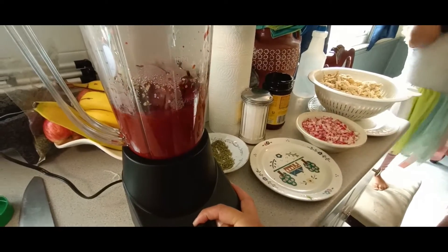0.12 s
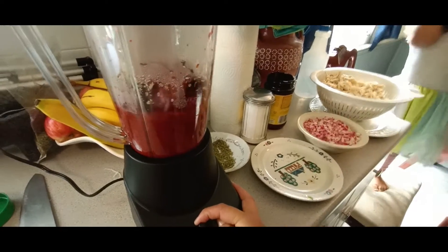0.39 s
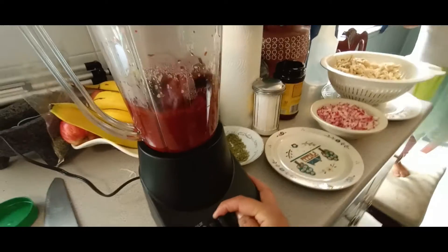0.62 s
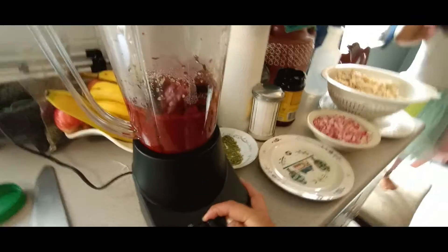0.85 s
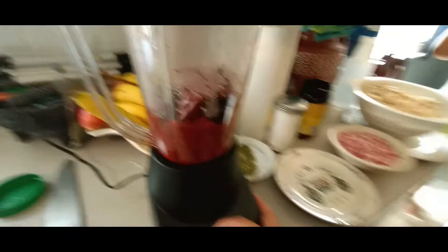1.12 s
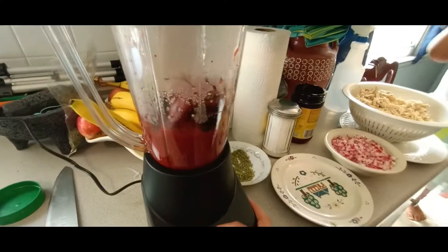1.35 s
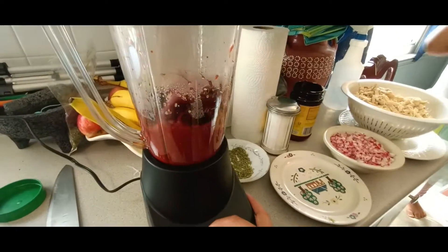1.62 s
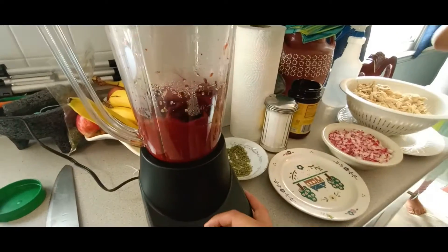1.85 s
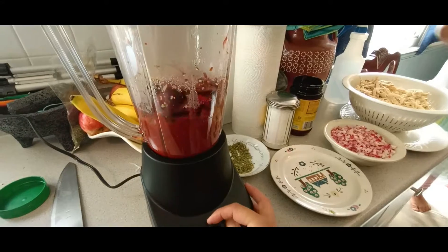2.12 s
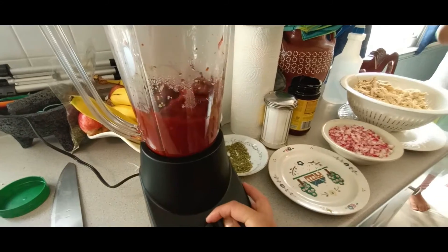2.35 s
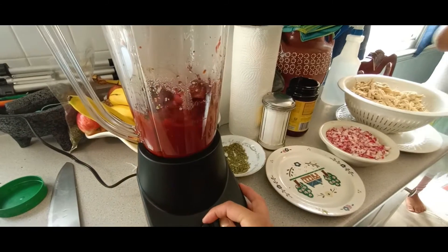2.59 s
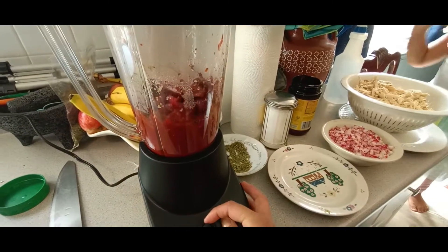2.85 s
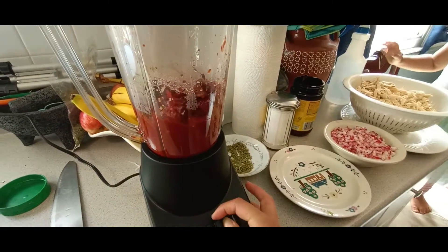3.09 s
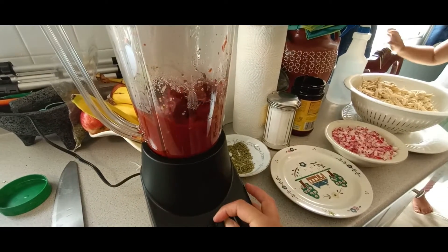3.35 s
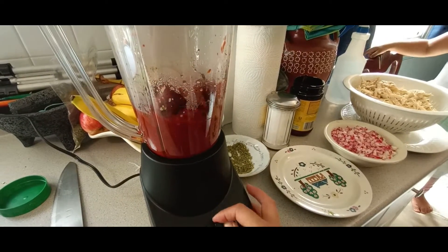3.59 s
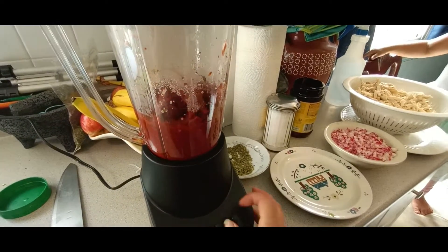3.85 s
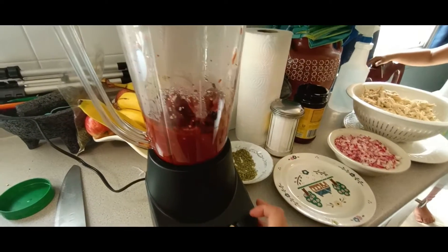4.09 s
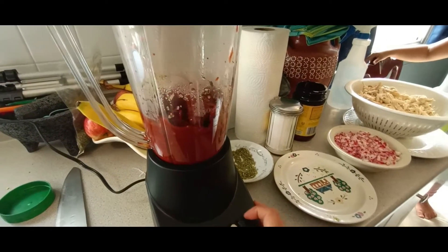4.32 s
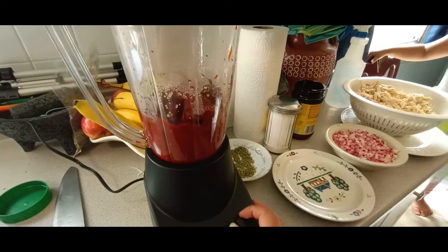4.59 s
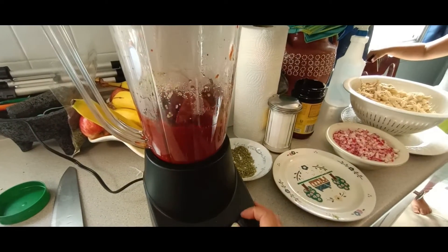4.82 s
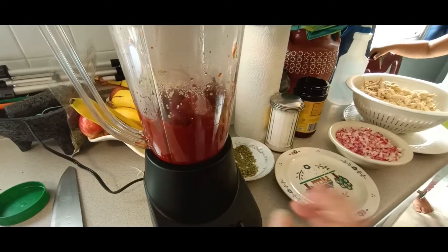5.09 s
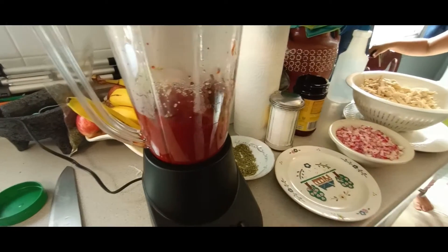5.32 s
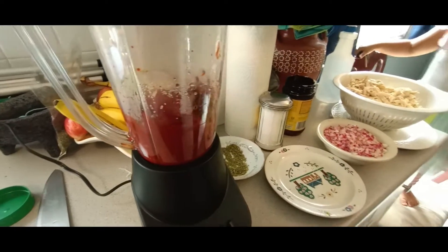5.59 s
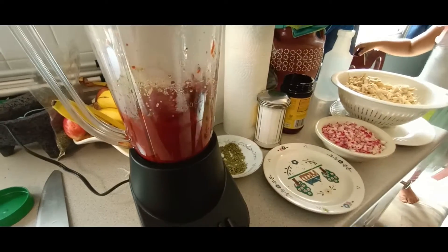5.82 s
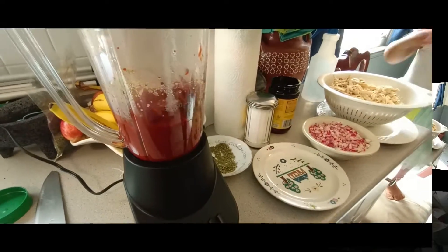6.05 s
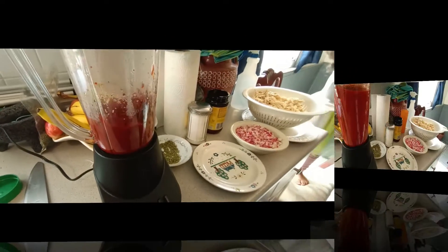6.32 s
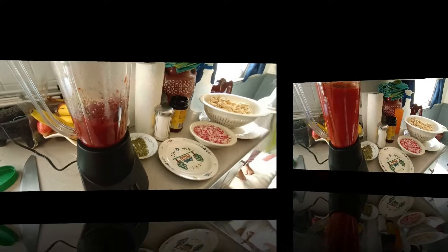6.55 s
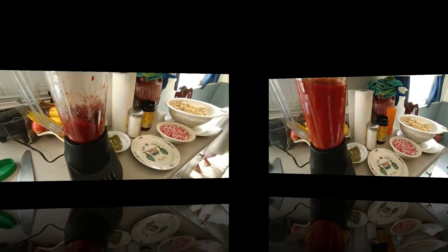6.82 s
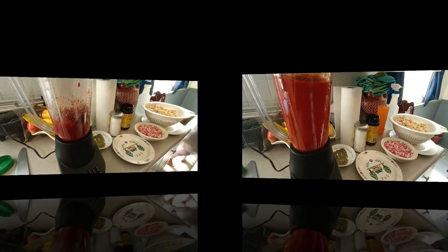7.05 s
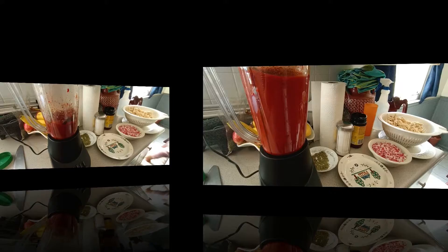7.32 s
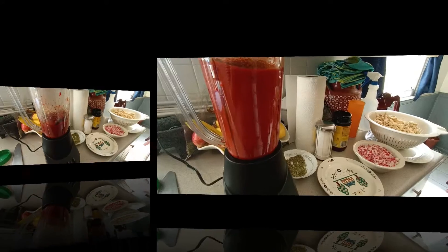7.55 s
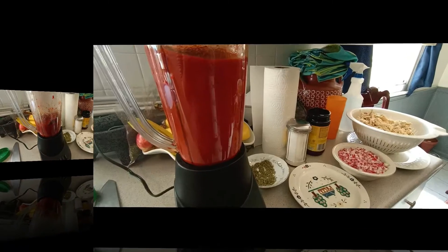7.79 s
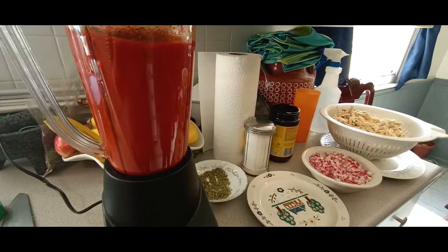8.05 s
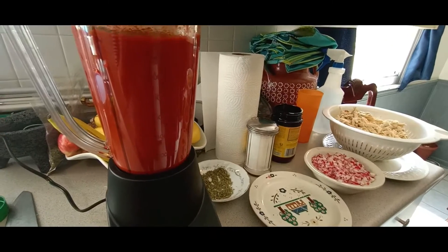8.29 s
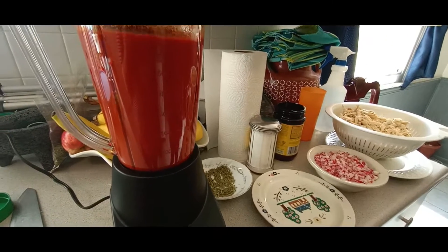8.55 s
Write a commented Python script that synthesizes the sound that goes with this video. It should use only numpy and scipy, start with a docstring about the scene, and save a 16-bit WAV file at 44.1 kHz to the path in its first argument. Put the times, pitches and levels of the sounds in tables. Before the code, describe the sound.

Close, dense blender noise: broadband rushing air and spray hiss, a ringing plastic jar, rapid blade rattle and a high electric whine over a faint low buzz. Soft fruit pulp makes it pulse and wobble unevenly, busiest early on. Short kitchen reflections surround it. The sound fades away, goes silent briefly, and a second smoother blend with a full jar swells in at the very end.

```python
"""Blender pureeing soft food

A countertop blender runs close to a mono microphone in a kitchen. Air, churning pulp and knocks are shaped
noise that rings the jar and base. The motor whines on multiples of its shaft speed, which sags when the
blades catch a lump; a faint buzz of its windings lies underneath, and the roar has kitchen reflections.
The sound is faded out, and after a silence the now fuller jar, running steadily, is faded in.
"""
import sys
import numpy as np
from scipy import signal
from scipy.fft import rfft, irfft, next_fast_len
from scipy.io import wavfile
from scipy.ndimage import uniform_filter1d

SR = 44100
rng = np.random.default_rng(int(sys.argv[2]) if len(sys.argv) > 2 else 0)


def wrap_up_sound(samples):
    """Save the sound to the file named by the first command line argument, as 16-bit audio."""
    columns = np.atleast_2d(samples).T
    # keep every value between -1 and 1, then stretch to whole-number steps
    tamed = np.clip(columns, -1, 1)
    steps = np.round(tamed * 32767).astype(np.int16)
    wavfile.write(sys.argv[1], SR, steps)


def ratio(d):
    """dB to gain"""
    e = np.asarray(d, float) / 20
    return 10 ** e


N = 382347
SWITCH_S = 8.2  # the second run takes over here, during the silence

# Broad colour of the roar, before its overall level is set: (frequency [Hz], relative level [dB])
ROAR_COLOUR = [(20, -44.5), (70, -35), (105, -22.5), (125, -15), (225, -12), (330, -8.5), (600, -8),
               (800, -6), (1570, -10), (1700, -8), (2400, -7.5), (3450, -10.5), (3800, -15), (7300, -12),
               (8600, -26), (11200, -25), (12800, -34.5), (14000, -30), (14700, -26.5), (15700, -25.5)]
# Resonances of jar, base and counter: (frequency [Hz], width [Hz], height over the roar [dB])
JAR_RESONANCES = [(121, 14, 10), (143, 15, 4.5), (154, 15, 2), (201, 8, 2), (348, 38, 9.5), (383.5, 27, 6),
                  (431.5, 19, 5), (761, 120, 4), (896, 55, 3), (1142, 48, 3), (1182, 30, 4), (1420, 93, 2),
                  (1640, 80, 0.5), (1900, 120, 0), (2325, 61, 3.5), (2450, 65, 5), (2707, 140, 3.5),
                  (3065, 52, 5), (3400, 150, 4.5), (4696, 410, 4), (5610, 130, -1), (5880, 200, 4),
                  (6090, 100, 7.5), (6520, 240, 4), (7200, 240, 2.5), (9920, 240, 0)]
# Change of colour when the jar is full: (frequency [Hz], change [dB])
FULL_JAR_COLOUR = [(100, -6), (160, -6.5), (220, -3), (370, 1.5), (500, -5), (600, 1.5), (800, 1),
                   (1200, -2.5), (2200, 1), (2800, -3.5), (4500, 5), (7000, -1.5), (12000, 1), (15000, -1)]
# Lumps caught by the blades: (time [s], surge in the bass of the jar [dB], surge in its middle ring [dB],
# surge in the spray hiss [dB], strength of the speed sag [Hz])
CAUGHT_LUMPS = [(0.0, 4, 3, 3.5, 3), (0.13, 2, 0.5, 3, 0), (0.28, 4.5, 3, 4, 6), (0.45, 2.5, 1.5, 4, 4),
                (0.56, 3, 2, 2.5, 3), (0.721, 2.5, 1.5, 3.5, 2), (0.81, 2.5, 1.5, 2.5, 1),
                (0.89, 3.5, 1.5, 4, 6), (1.05, 3, 3.5, 3, 0.5), (1.17, 3, 3, 3, 2), (1.3, 4, 0.5, 3.7, 4),
                (1.42, 0.5, 2, 2, 1), (1.56, 1.5, 3.5, 3, 3), (1.64, 1, 1.5, 1.5, 0),
                (1.73, 1.5, 4, 1.7, 6), (1.83, 1.5, 2.5, 2.5, 1), (1.94, -0.5, 2.5, 2, 4),
                (2.02, 0.5, 1, 2.5, 1), (2.18, 3, 3, 2.5, 4), (2.28, 1, 0, 0.5, 0), (2.4, 2, 3.5, 2, 1),
                (2.54, -1.5, -3, 2, 1), (2.7, -1, 1.5, 0.5, 3), (2.63, -0.5, 0, 0.5, 0),
                (2.78, 0.5, 0.5, 0, 0), (2.84, 3, 1.5, 2, 4), (2.951, 0.5, 0, 1, 1), (3.159, 2, 1.5, 3, 3),
                (3.47, 2, 3, 1.5, 5), (3.82, 2, 1.5, 2, 3), (3.9, 1.5, -2, -0.5, 4), (4.32, 0, 1.5, 1.5, 3),
                (4.42, 1.5, 0.5, 2.5, 0), (4.57, 0.5, 0.5, 1, 3), (4.7, 0, 2, 1, 2), (4.79, 1.5, 1.5, 1, 0),
                (4.85, 3, 3.5, 2, 4), (4.97, 1, 1, 0.5, 0.5), (5.141, 1.5, 2.5, 3, 4),
                (5.26, 1.5, 1.5, 3, 1), (5.4, 1, 1.5, 2, 2), (5.56, 3, 1.5, 2, 1), (5.659, 4, -0.5, -1, 0),
                (5.76, 2.5, 3, 1, 1), (5.871, 0.5, 3, 2.5, 1), (6.08, 3.5, 0, 3, 4), (6.28, 1.5, 2, 2.5, 3),
                (6.54, 3.5, 1.5, 2.5, 5), (6.81, 0.5, 2, 4, 1.5), (6.93, 3, -0.5, 2, 1),
                (7.08, 1.5, 1, 2, 0), (7.18, 0.5, -0.5, 3, -0.5), (7.28, 2.5, 3, 3.5, 1),
                (7.419, 0.5, 2, 4.5, 3.5), (7.55, 2, 1, 2, 0), (7.79, 1, 0, 3, 2)]
# Steady churning under the surges: (time [s], bass [dB], middle [dB], hiss [dB])
STEADY_CHURN = [(0, -0.9, -.3, -.3), (1.2, -.8, -0.22, -.3), (2.2, -0.6, -.3, -0.087), (3, 0, 0.29, 0.61),
                (3.7, 0, 0.79, 1), (4.2, -0.5, 0.45, 0.56), (4.8, 0, 0.51, 0.68), (5.5, .5, 0, 0.42),
                (6.3, -1, -0.31, 0.28), (7, 0.5, -0.54, -0.0089), (7.9, 0, -1, -.5)]
# First run, between lumps: (time [s], shaft speed [Hz], tone once a turn [dB], tone twice a turn [dB],
# whine ten times a turn [dB])
SHAFT_COURSE = [(0.0, 272.8, -46, -38.5, -40.5), (0.3, 277.6, -37, -39.5, -32.5),
                (0.75, 279.4, -36.5, -35.5, -33.5), (1.3, 280.1, -36.5, -36, -33),
                (1.7, 280.8, -36.5, -34.5, -34.5), (1.95, 277, -37, -39.5, -33),
                (2.2, 274.2, -35, -38, -34.5), (2.35, 269.8, -31, -31.5, -42),
                (2.55, 273.7, -42, -47.5, -34), (2.7, 280, -39.5, -37, -39), (2.95, 278, -40, -33.5, -32.5),
                (3.1, 285.9, -29, -42, -34), (3.5, 283.4, -36, -36, -47), (3.8, 292.3, -30, -32.5, -44.5),
                (4.1, 284.6, -29.5, -37, -33), (4.2, 278.8, -44, -34.5, -36.5),
                (4.6, 278.3, -40.5, -35, -34), (5.1, 277.5, -42.5, -33, -36.5),
                (5.25, 271.9, -36, -40, -35), (5.7, 278.4, -40.5, -42, -36), (6.1, 277.9, -41, -41, -37),
                (6.4, 275.2, -37.5, -42, -36), (6.65, 268.4, -32, -38, -40), (7.0, 278, -37, -44, -42),
                (7.9, 273.6, -39, -42, -43)]
# Weaker tones of the first run: (multiple of the shaft speed, level [dB])
FAINT_TONES = [(4, -45.5), (11, -47), (12, -44), (17, -47.5), (20, -48)]
# Tones of the second run, before their common level: (multiple of the shaft speed, relative level [dB])
FULL_JAR_TONES = [(1, -6), (2, 0), (3, -5), (4, -8), (5, -16), (7, -14), (8, -13), (9, -11)]
# Swell of the winding buzz: (time [s], change of level [dB])
BUZZ_SWELL = [(0, -3.5), (.7, 4), (1.5, 3), (2.5, -0.5), (4, -3), (6, -2), (8.67, -3)]
# Fader, out and back in: (time [s], gain [factor])
FADER_MOVES = [(0, 0.98), (6.42, 1), (6.9, 0.71), (7.4, 0.28), (7.75, 0.1), (7.94, 0.015), (7.945, 0),
               (8.458, 0), (8.462, 0.08), (8.5, 0.23), (8.56, 0.41), (8.67, 0.66)]

# The pulp's three bands are bass, middle and hiss
CHURN_HZ = (700, 2600, 6000)
SLOSH_DB = (0.5, 0.43, 0.4)  # random sloshing between the lumps
# The motor's three strong tones sound once, twice and ten times a turn
SAG_DB_PER_HZ = (-0.76, -0.7, 0.35)  # under load the low tones thin out and the whine flares
BEAT_DB = (1.7, 2.2, 1.4)  # slow wavering


def roar(angle):
    """The stirring passes the jar's resonances, which raise some pitches of its noise."""
    roar_db = -18
    churned = stirred_pulp(angle)
    size = next_fast_len(N + SR)
    hz = np.fft.rfftfreq(size, 1 / SR)
    colour_db = read(ROAR_COLOUR, hz)
    for centre, width, height_db in JAR_RESONANCES:
        colour_db = colour_db + height_db / (1 + (2 * (hz - centre) / width) ** 2)
    coloured = irfft(rfft(churned, size) * ratio(colour_db), size)[:N]
    return ratio(roar_db) * evened(coloured)


def stirred_pulp(angle):
    """The stirring noise swells with the churn and in drifting patches of pitch and time."""
    hz, t, spectrum = signal.stft(stir(angle), SR, nperseg=1024, noverlap=768)
    place = np.interp(np.log(hz + 1), np.log(CHURN_HZ), np.arange(3))
    # Each frequency follows the nearest one or two bands
    share = np.clip(1 - abs(place[:, None] - np.arange(3)), 0, 1)
    # The top hiss is partly steady fan air, so it swells less
    share *= np.interp(hz, (7500, 9500), (1, 0.6))[:, None]
    first_db = share @ churn(t) * (t < SWITCH_S)
    # The full jar churns steadily, with only a change of colour
    second_db = np.outer(read(FULL_JAR_COLOUR, hz), t >= SWITCH_S)
    patches = rng.standard_normal(spectrum.shape[::-1]).T
    patches = uniform_filter1d(patches, size=14, axis=0)
    patches = evened(uniform_filter1d(patches, size=10, axis=1))
    swollen = spectrum * ratio(first_db + second_db + 0.81 * patches)
    return signal.istft(swollen, SR, nperseg=1024, noverlap=768)[1][:N]


def stir(angle):
    """Turbulence, plus a rattle of short bursts as the blades strike lumps at the same point of a turn."""
    rattle_db, burst_s = -8, 0.0009
    new_turn = np.diff(np.floor(angle / (2 * np.pi)), prepend=0) > 0
    strength_db = 3 * np.minimum(rng.exponential(1, N), 3)
    struck = rng.random(N) < 0.7  # some turns miss
    strikes = ratio(strength_db) * new_turn * struck
    t = np.arange(600) / SR
    burst = signal.oaconvolve(strikes, t ** 2 * np.exp(-t / burst_s))[:N]
    soft = uniform_filter1d(rng.standard_normal(N), size=3)  # soft food: duller than the rush
    return rng.standard_normal(N) + ratio(rattle_db) * evened(burst * soft)


def churn(t):
    """Pulp piles up against the blades, then is thrown clear: level [dB] of three bands, a surge per lump."""
    rise_s, fall_s = 0.032, 0.017
    s, *surge_db, _ = np.transpose(CAUGHT_LUMPS)
    lag = t - s[:, None]
    shape = np.exp(-0.5 * (lag / np.where(lag < 0, rise_s, fall_s)) ** 2)
    slosh = [db * np.interp(t, np.arange(N) / SR, wander(size=1800)) for db in SLOSH_DB]
    return surge_db @ shape + slosh + columns(STEADY_CHURN, t)


def motor(angle):
    """Whine of the run in progress and buzz of the windings, scaled so that tone levels mean rms."""
    t = np.arange(N) / SR
    whine = np.where(t < SWITCH_S, first_whine(angle, t), second_whine(angle))
    return np.sqrt(2) * (whine + winding_buzz(t))


def shaft_angle():
    """Radians turned: the summed shaft speed, which trembles a little around its course."""
    t = np.arange(N) / SR
    full_hz = 253
    hz = np.where(t < SWITCH_S, columns(SHAFT_COURSE, t)[0] - lost_hz(t), full_hz)
    trembling = hz * (1 + 0.0015 * wander(size=700))
    return 2 * np.pi * np.cumsum(trembling) / SR


def first_whine(angle, t):
    """Multiples of the shaft speed (imbalance, blade pair, fan or commutator), fluttering with the load."""
    tones = list(FAINT_TONES)
    levels = columns(SHAFT_COURSE, t)[1:]
    for k, db, slope, beat_db in zip((1, 2, 10), levels, SAG_DB_PER_HZ, BEAT_DB):
        tones.append((k, db + slope * lost_hz(t) + beat_db * wander(size=2500)))
    total = np.zeros(N)
    for k, db in tones:
        flutter_db = 1 + 2 / k  # the low tones shake most
        total += ratio(db + flutter_db * wander(size=500)) * np.cos(round(k) * angle)
    return total


def second_whine(angle):
    """Multiples of the shaft speed under a full jar, each at a steady level."""
    tones_db = -28
    return ratio(tones_db) * sum(ratio(db) * np.cos(round(k) * angle + k * k) for k, db in FULL_JAR_TONES)


def winding_buzz(t):
    """The windings buzz at twice the mains frequency, whatever the shaft does."""
    buzz_hz, buzz_db = 121, -50.5
    level_db = buzz_db + columns(BUZZ_SWELL, t)[0] + 2.5 * wander(size=4000)
    return ratio(level_db) * np.cos(2 * np.pi * buzz_hz * t)


def sag(t):
    """Speed lost to the lumps [Hz]: just after each surge a sudden drop, then a slower recovery."""
    lag_s, brake_s, regain_s = 0.015, 0.01, 0.17
    out = np.zeros(len(t))
    for s, *_, hz in CAUGHT_LUMPS:
        after = np.maximum(t - s - lag_s, 0)
        out += hz * (1 - np.exp(-after / brake_s)) * np.exp(-after / regain_s)
    return out


def lost_hz(t):
    """The sag [Hz], worked out every few milliseconds and joined by straight lines."""
    return np.interp(t, t[::128], sag(t[::128]))


def kitchen(x):
    """Reflections comb the spectrum finely; a hand-held microphone drifts through three patterns of them."""
    t60_s, reflections_db = 0.35, -11  # time to die by 60 dB; level against the direct sound
    t = np.arange(SR // 2) / SR
    tails = rng.standard_normal((3, len(t))) * ratio(-60 * t / t60_s) * (t > 0.002)
    tails = signal.lfilter([1, -1], [1, -0.97], tails)  # the bass comes through the counter, not the walls
    tails = tails / np.linalg.norm(tails, axis=1, keepdims=True)
    drift = np.pi * (np.arange(N) / SR / 4.5 + np.arange(3)[:, None] / 3)
    feeds = x * np.sqrt(2 / 3) * np.cos(drift)  # the squares of the three weights sum to 1
    wet = signal.oaconvolve(feeds, tails, axes=1)[:, :N].sum(0)
    return (x + ratio(reflections_db) * wet) / np.sqrt(1 + ratio(2 * reflections_db))


def wander(size):
    """Slow random drift of rms 1, smoothed twice over size samples."""
    return evened(uniform_filter1d(uniform_filter1d(rng.standard_normal(N), size), size))


def evened(x):
    """Scales to rms 1."""
    return x / np.sqrt(np.mean(x ** 2) + 1e-20)


def read(points, hz):
    """Reads a spectrum table, joining its points along a log-frequency axis."""
    f, value = np.transpose(points)
    return np.interp(np.log(hz + 1), np.log(f + 1), value)


def columns(rows, t):
    """Joins the rows of a table by straight lines in time, one curve per column."""
    s, *values = np.transpose(rows)
    return [np.interp(t, s, v) for v in values]


def scene():
    """Roar with its kitchen reflections, plus the motor tones, the same in both channels."""
    angle = shaft_angle()
    return np.tile(motor(angle) + kitchen(roar(angle)), (2, 1))


def low_pass(x):
    """Removes everything above the highest recorded frequency."""
    return signal.sosfilt(signal.butter(12, 17090, fs=SR, output="sos"), x)


def record(dry):
    """A gently saturating input, a limit on the treble, then the fader."""
    edge_hz = 15740
    soft = 0.9 * np.tanh(dry / 0.9)
    lowpass = signal.firwin(801, edge_hz, window=("kaiser", 10), fs=SR)
    band = signal.oaconvolve(soft, lowpass[None], "same")
    fader = np.clip(columns(FADER_MOVES, np.arange(N) / SR)[0], 0, 2)
    return low_pass(band * fader)


dry = scene()
out = record(dry)
wrap_up_sound(out)
```